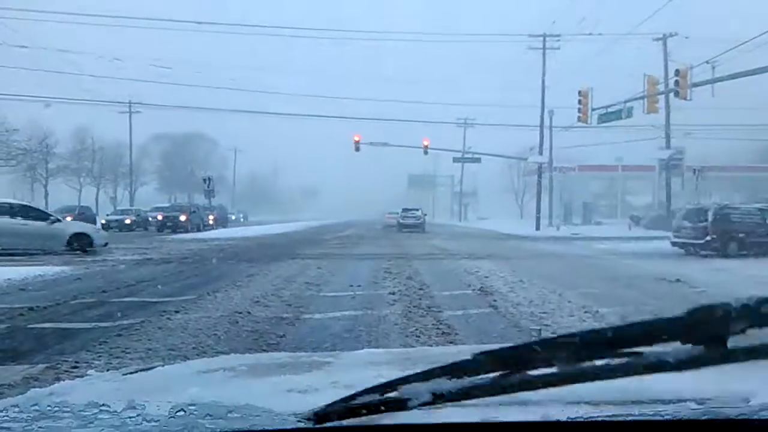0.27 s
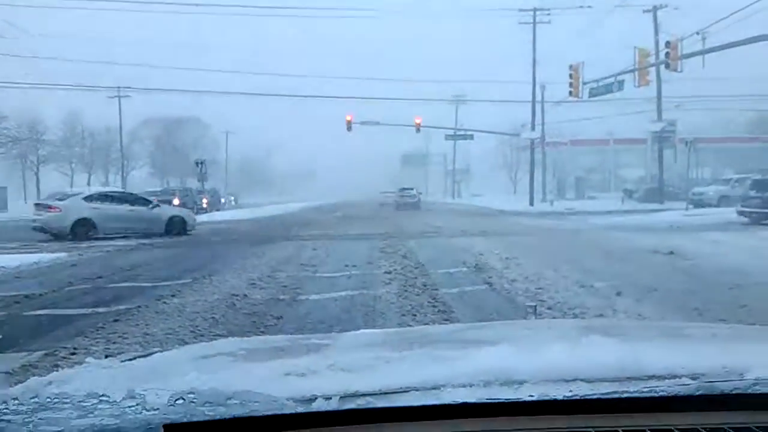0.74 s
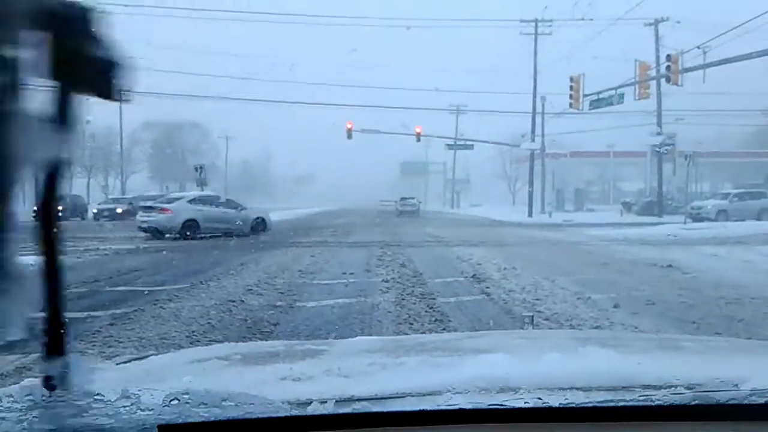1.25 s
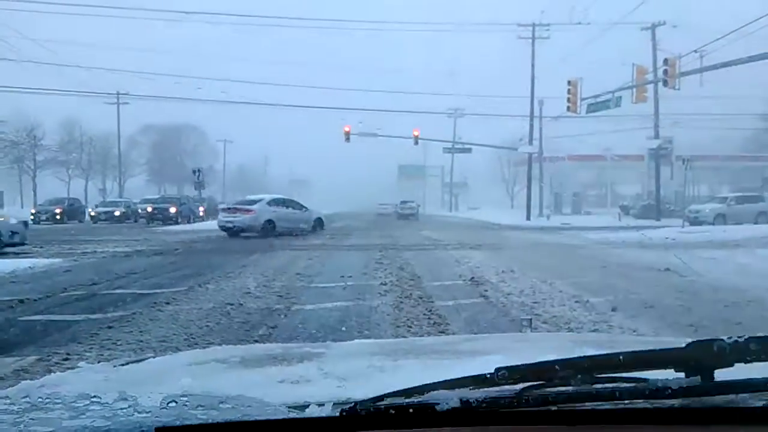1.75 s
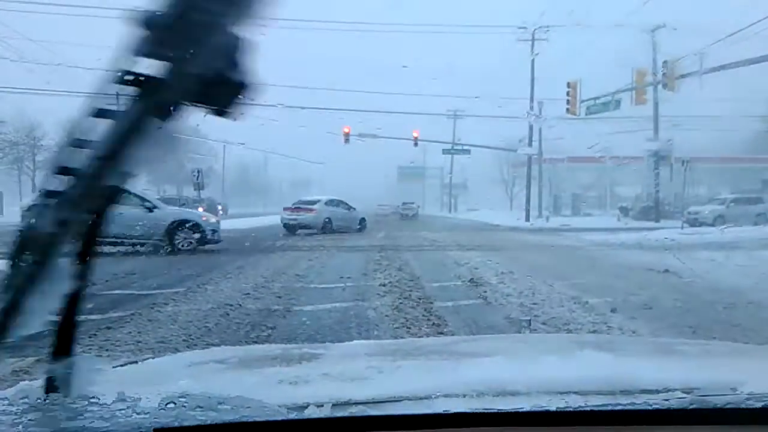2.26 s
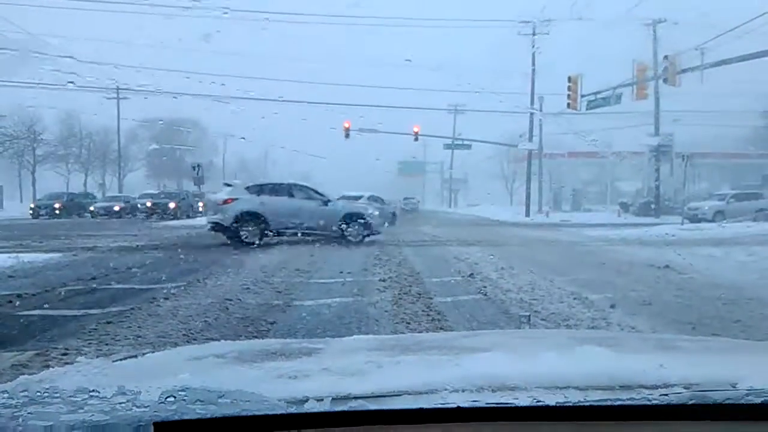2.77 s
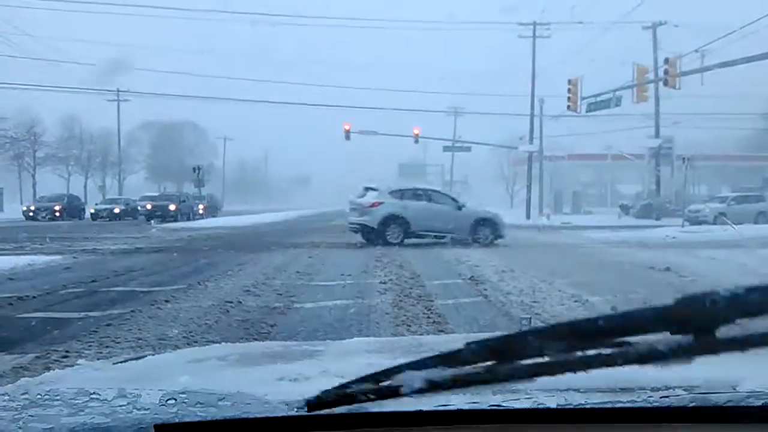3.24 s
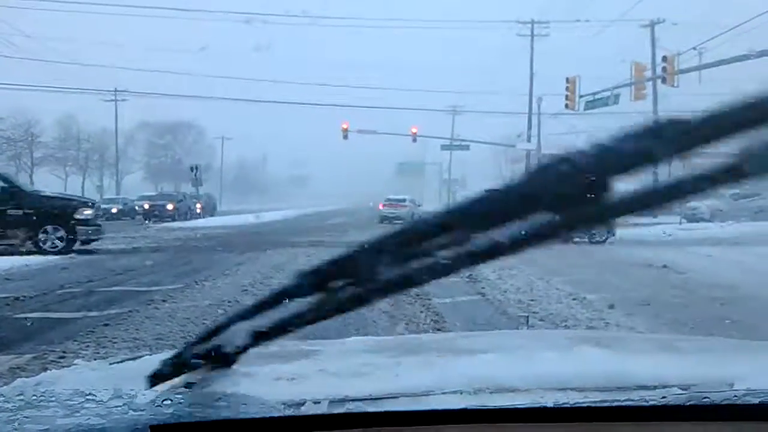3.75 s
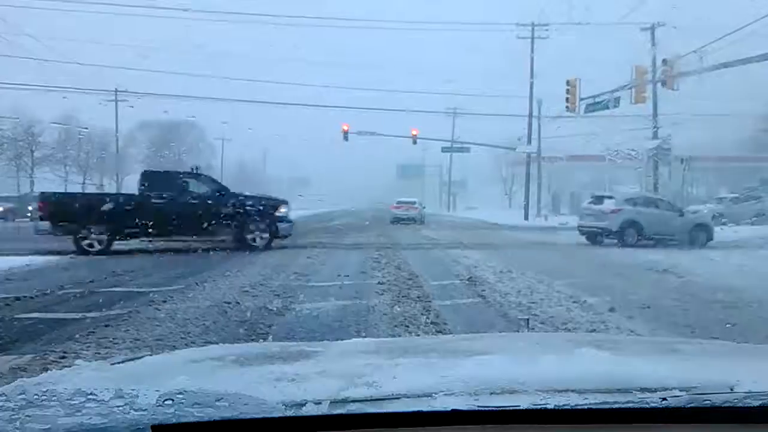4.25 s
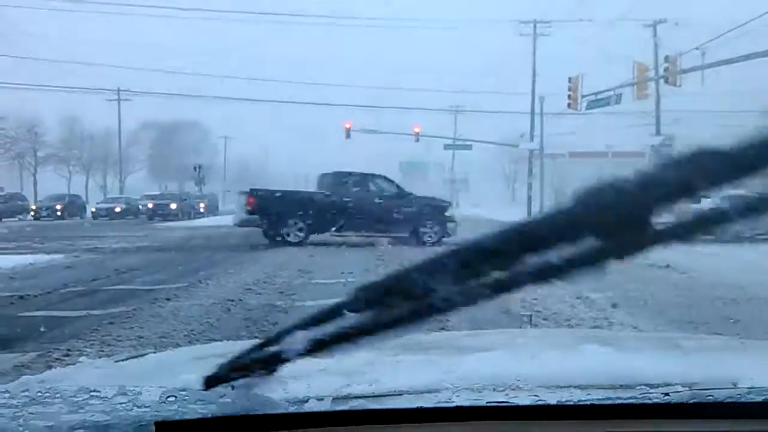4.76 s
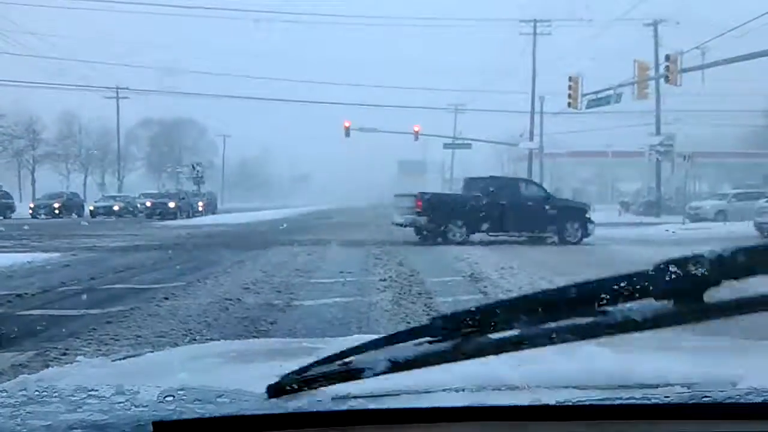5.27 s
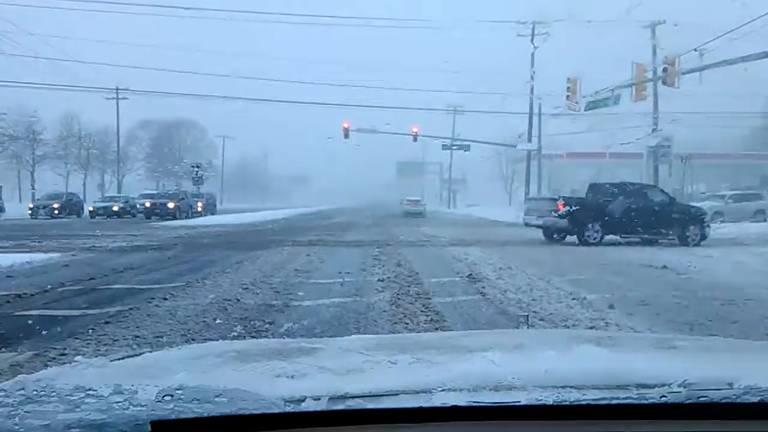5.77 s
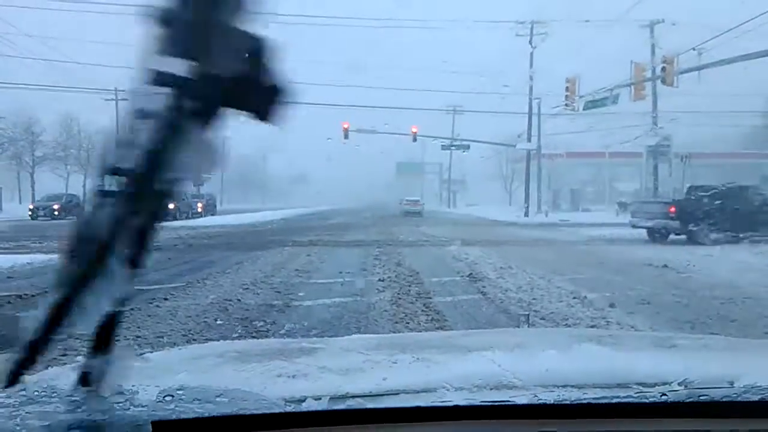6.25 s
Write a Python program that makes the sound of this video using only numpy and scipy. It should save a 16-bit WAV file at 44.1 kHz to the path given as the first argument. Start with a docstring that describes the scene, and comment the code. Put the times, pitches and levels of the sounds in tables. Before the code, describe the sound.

Windshield wipers judder loudly up wet glass three times, with soft hissing glides and flip-over knocks between, over a low idling engine inside a car.

```python
"""Wiper blades sweep a windshield every 1.65 s, heard by two microphones inside a car idling in falling snow.
On three upstrokes the rubber judders: stick-slip impulses, mostly slowing, drum the glass and ring the frame.
Between these the blades glide with a soft hiss of shaped noise and flip over at each end with short noise bursts.
The linkage thumps in decaying low sines, and brief gliding tones squeak.
Beneath lie the engine rumble and the heater air, both steady noise in low bands."""
import sys
import numpy as np
from scipy import signal
from scipy.fft import rfft, irfft, next_fast_len
from scipy.io import wavfile
from scipy.ndimage import uniform_filter1d, minimum_filter1d, map_coordinates

SR = 44100
rng = np.random.default_rng(int(sys.argv[2]) if len(sys.argv) > 2 else 0)


def persist_wave(psi):
    """Save psi, clipped to +-1, as 16-bit WAV."""
    counts = np.round(np.clip(psi, -1, 1) * 32767).astype(np.int16)
    wavfile.write(sys.argv[1], SR, np.atleast_2d(counts).T)


N = 287091  # length in samples

# Juddering upstrokes. Each row: start in seconds, length in seconds, level in dB, extra rattle and rasp in dB.
JUDDER_STROKES = [(2.095, .53, -1, 0), (3.737, 0.53, 0.1, 0.6), (5.38, 0.499, .5, -1.5)]
# The blades turn at the bottom of the glass. Each row: time in seconds, level in dB.
BOTTOM_FLIPS = [(.192, 0), (1.838, -0.5), (3.483, -0.5), (5.141, -.5)]
# The blades turn at the top of the glass. Each row: time in seconds, then snap, knock and tick levels in dB.
TOP_FLIPS = [(.995, -38, -29.5, -42.5), (2.659, -32.5, -29.5, -41), (4.308, -35.5, -33.5, -52),
             (5.953, -36, -31.5, -43)]
# Where along a juddering stroke (share of it) the blades fall out of step, and where they settle again.
STUMBLE_AT, SETTLE_AT = 0.23, 0.63


def amp(db):
    """Decibels to gain."""
    return 10 ** (np.asarray(db) / 20)


def unit(x):
    """Scale to rms 1."""
    return x / np.sqrt(np.mean(x ** 2) + 1e-20)


def steady(x, span=0.026):
    """Hold the running rms, over about span seconds, near 1, so that a level curve can set it."""
    power = np.mean(np.atleast_2d(x) ** 2, axis=0)
    smooth = uniform_filter1d(power, int(span * SR))
    smooth = uniform_filter1d(smooth, int(span * SR / 2))
    return x / np.sqrt(np.abs(smooth) + 1e-12)


def along(points, hz):
    """Read a curve of (Hz, value) points on a log frequency axis."""
    f, value = np.transpose(points)
    return np.interp(np.log(hz + 1), np.log(f + 1), value)


def curves(rows):
    """One value per sample for each column after the time."""
    s, *columns = np.transpose(rows)
    return [np.interp(np.arange(N) / SR, s, column) for column in columns]


def wobble(rate):
    """A smooth random curve with rate knots a second."""
    knots = rng.standard_normal(int(N * rate / SR) + 4)
    return map_coordinates(knots, [np.arange(N) * rate / SR])


def filtered(x, response):
    """Multiply the spectrum of x by a response of frequency."""
    n = x.shape[-1]
    m = next_fast_len(n + 8192)
    return irfft(rfft(x, m) * response(np.fft.rfftfreq(m, 1 / SR)), m)[..., :n]


def noise(spectrum, envelope=1., size=N):
    """Stereo noise of rms 1, shaped in time and then in colour: alike in the bass, diffuse in the treble."""
    # Likeness of the two microphones. Each row: frequency in Hz, left-right correlation from -1 to 1.
    likeness = [(60, 1), (130, 0.99), (290, 0.72), (630, 0.75), (1370, -0.42), (3000, 0.21), (6500, -0.17)]

    def mid_and_side(hz):
        turn = np.arccos(np.clip(along(likeness, hz), -1, 1)) / 2
        return amp(along(spectrum, hz)) * np.array([np.cos(turn), np.sin(turn)])

    white = envelope * rng.standard_normal((2, size))
    mid, side = filtered(white, mid_and_side)
    return unit(np.array([mid + side, mid - side]))


def cabin(x, t60, wet_db):
    """Dense, short reflections off glass and dashboard, different at each microphone."""
    t = np.arange(SR // 6) / SR
    tail = rng.standard_normal((2, len(t))) * amp(-60 * t / t60)
    tail /= np.linalg.norm(tail, axis=1, keepdims=True)
    return x + amp(wet_db) * signal.fftconvolve(x, tail, axes=1)[:, :N]


def restless(x, depth_db):
    """The colour shifts in patches as the blade travels over new parts of the glass."""
    z = signal.stft(x, nperseg=1024)[2]
    patches = uniform_filter1d(rng.standard_normal(z.shape[1:]), size=7, axis=0)
    patches = uniform_filter1d(patches, size=5, axis=1)
    return signal.istft(z * amp(depth_db * unit(patches)), nperseg=1024)[1][:, :N]


def add(track, s, sound):
    """Mix a sound in at time s."""
    part = track[:, max(round(s * SR), 0):][:, :sound.shape[-1]]
    part += sound[..., :part.shape[1]]


def idle():
    """The engine booms in the low modes of the cabin, under the steady air of the heater fan."""
    # Common level of rumble and air. Each row: time in seconds, level in dB.
    background = [(0, 2), (.3, 0.5), (1.08, 1), (1.17, -5), (1.35, -1.5), (1.7, 1.5), (2.9, -2),
                  (3.6, -0.5), (4.7, -2), (5.25, 1), (6.1, -1.5), (6.51, -5)]
    # Colour of the engine boom. Each row: frequency in Hz, relative level in dB per Hz.
    boom_colour = [(15, -14.5), (27, -18.5), (38, -28), (47, -17.5), (62, -1), (75, 2), (92, -2),
                   (118, 3.5), (150, -1.5), (185, -5), (230, -17.5), (400, -53), (900, -84.5)]
    # Colour of the heater air. Each row: frequency in Hz, relative level in dB per Hz.
    air_colour = [(140, -26), (230, -4), (253, -1.5), (291, -3.5), (360, 1), (470, -10), (508, -7),
                  (590, -14), (643, -6.5), (770, -16), (839, -7), (1090, -21), (1500, -28), (1950, -66.5),
                  (3300, -120)]
    level_db, = curves(background)
    rumble = amp(-31 + 1.5 * wobble(14)) * steady(noise(boom_colour), span=0.32)
    air = amp(-40.5 + 1.1 * wobble(10.0)) * noise(air_colour)
    return amp(level_db) * (rumble + air)


def around(turns, rise_db_per_s, fall_db_per_s):
    """Gain that grows towards each turn of the blades and fades after it."""
    t = np.arange(N) / SR
    return sum(amp(-np.maximum(rise_db_per_s * (s - t), fall_db_per_s * (t - s))) for s, *_ in turns)


def gate(start, length, edge_s):
    """Gain that opens at start and closes after length seconds."""
    age = np.arange(N) / SR - start
    return np.clip(np.minimum(age, length - age) / edge_s + .5, 0, 1)


def glide():
    """Rubber hisses grainily over wet glass, most in the slush at both ends of the sweep, and sings going down."""
    # Colour of the wet hiss. Each row: frequency in Hz, relative level in dB per Hz.
    hiss_colour = [(700, -35), (1150, -15.5), (1600, 1.5), (2100, 0), (2600, 1.5), (3000, -1), (3600, -5),
                   (5100, -7.5), (6500, -12.5), (7300, -20.5), (8200, -37.5), (14500, -49.5)]
    # Colour of the thin singing. Each row: frequency in Hz, relative level in dB per Hz.
    sing_colour = [(1900, -37), (2350, -11), (2600, 3), (2950, -1), (3300, -11), (4200, -35), (8000, -70.5)]
    # Colour of the narrow whistle. Each row: frequency in Hz, relative level in dB per Hz.
    whistle_colour = [(4000, -52.5), (4750, -9.5), (5000, -10.5), (5300, -10), (6200, -51.5)]

    mid_glass = amp(-61.5)
    bottom = amp(-52) * around(BOTTOM_FLIPS, rise_db_per_s=23, fall_db_per_s=36)
    top = amp(-48) * around(TOP_FLIPS, rise_db_per_s=597, fall_db_per_s=74)
    wet = np.sqrt(mid_glass ** 2 + bottom ** 2 + top ** 2)
    grain = amp(1.5 * wobble(300))
    hiss = wet * amp(1.1 * wobble(25)) * restless(noise(hiss_colour, grain), depth_db=1.3)

    # the rubber sings on the last part of each downstroke
    sing_s = 0.25
    descent = sum(gate(s - sing_s, sing_s, edge_s=.02) for s, _ in BOTTOM_FLIPS)
    sing = amp(-57 + 1.6 * wobble(35)) * descent * noise(sing_colour, amp(3.0 * wobble(160)))

    # one downstroke whistles thinly
    whistle = amp(-64) * gate(2.83, length=0.36, edge_s=0.1) * noise(whistle_colour)
    return hiss + sing + whistle


def flip(snap_db, knock_db, tick_db, t60):
    """The lip turns over with a wet snap and a tick while the arm knocks on its joint."""
    # Colour of the snapping lip. Each row: frequency in Hz, relative level in dB per Hz.
    snap_colour = [(600, -39), (1150, -4), (1500, 0.5), (1900, 0.5), (2400, 0.5), (2900, 0), (3400, -10.5),
                   (4000, -14), (7000, -42), (9000, -61.5)]
    # Colour of the tick. Each row: frequency in Hz, relative level in dB per Hz.
    tick_colour = [(2000, -22), (3500, -11), (4300, 3), (4900, -5), (5600, -7.5), (6600, -11), (7400, -24),
                   (8500, -33), (14000, -55.5)]
    # Colour of the knocking arm. Each row: frequency in Hz, relative level in dB per Hz.
    knock_colour = [(150, -11), (350, 4.5), (520, 1), (650, -1.5), (800, 1), (1000, -3.5), (1250, -13),
                    (2500, -63), (7000, -87.5)]
    t = np.arange(SR // 4) / SR
    snap = amp(snap_db - 60 * t / max(t60, .01)) * noise(snap_colour, size=len(t))
    tick = amp(tick_db - 60 * t / .1) * noise(tick_colour, size=len(t))
    knock = amp(knock_db - 60 * t / 0.22) * noise(knock_colour, size=len(t))
    onset = 1 - np.exp(-t / .001)
    return (snap + tick + knock) * onset


def flips():
    """Three contacts at each bottom turn, one at each top turn, and a few scuffs on the way."""
    # Tick, flip and rebound of a bottom turn. Each row: delay in seconds, then snap, knock and tick
    # levels in dB before the level of the turn, and the snap's decay by 60 dB in seconds.
    contacts = [(-.017, -44, -43, -44, .09), (0, -35.5, -26.5, -53, .1), (.074, -40, -32, -58, .13)]
    # A blade catches on the way up. Each row: time in seconds, snap level in dB, knock level in dB.
    scuffs = [(.382, -52, -39.5), (.578, -41, -28.5), (.601, -39.5, -30), (2.64, -39, -36),
              (3.726, -46.5, -24)]
    out = np.zeros((2, N))
    for s, db in BOTTOM_FLIPS:
        for delay, *contact in contacts:
            add(out, s + delay, amp(db) * flip(*contact))
    for s, *levels_db in TOP_FLIPS:
        add(out, s, flip(*levels_db, t60=0.1))
    for s, snap_db, knock_db in scuffs:
        add(out, s, flip(snap_db, knock_db, tick_db=-67, t60=0.15))
    return restless(out, depth_db=3.5)


def thumps():
    """The linkage takes up its play and bumps the bulkhead, which answers with a pair of low, damped modes."""
    # Each row: time in seconds, level in dB ahead of a common 1 dB cut, pitch of the lower mode in Hz.
    bumps = [(0.418, -17.5, 153), (1.006, -14.5, 182), (2.059, -23, 118), (2.664, -13.5, 118),
             (3.591, -18, 121), (4.325, -14, 169.8), (4.351, -10.5, 119.3), (5.364, -10.5, 123),
             (6.255, -13.5, 106.6), (6.377, -14.5, 112.6)]
    out, t = np.zeros((2, N)), np.arange(SR // 3) / SR
    onset = 1 - np.exp(-t / 0.0046)
    for s, db, hz in bumps:
        modes = np.sin(2 * np.pi * hz * t) + 0.51 * np.sin(2 * np.pi * hz * 1.45 * t)
        decay = amp(db - 1 - 60 * t / 0.14)
        add(out, s - .003, decay * onset * modes)  # starts 3 ms ahead of the listed time
    return out


def squeaks():
    """The rubber edge squeaks briefly and hoarsely on a dry patch, its pitch trembling as it glides."""
    # Each row: start in seconds, length in seconds, level in dB, first and last pitch in Hz before the tremble.
    dry_patches = [(0.469, 0.033, -40, 1337, 1500), (0.478, 0.02, -50, 1966, 2270),
                   (1.072, 0.017, -47.5, 2150, 4070), (1.587, 0.014, -40.5, 2420, 2660),
                   (1.623, 0.035, -46, 2550, 2520), (2.702, 0.016, -41, 2410, 2780),
                   (3.236, 0.017, -46, 2564, 2600), (4.887, 0.023, -50.5, 2515, 2740)]
    out, tremble = np.zeros((2, N)), wobble(1500)
    flutter = amp(1.5 * wobble(250))
    for s, length, db, first_hz, last_hz in dry_patches:
        u = np.linspace(0, 1, max(int(length * SR), 16))
        hz = np.geomspace(first_hz, last_hz, len(u))
        hz = hz * (1 + .2 * tremble[round(s * SR):][:len(u)])
        arch = np.sqrt(4 * u * (1 - u))
        add(out, s, amp(db) * arch * np.sin(2 * np.pi * np.cumsum(hz) / SR))
    return cabin(out * flutter, t60=0.11, wet_db=0.0)


def progress():
    """For each juddering stroke, the share of it that has passed."""
    return np.array([(np.arange(N) / SR - start) / length for start, length, *_ in JUDDER_STROKES])


def roughness():
    """The blades slip evenly at both ends of a stroke and clash in the span between stumble and settling."""
    u = progress()
    clash = np.clip(np.minimum(u - STUMBLE_AT, SETTLE_AT - u) / .1 + .5, 0, 1).sum(axis=0)
    return np.clip(0.1299 + 0.483 * clash, 0, 1)


def falter():
    """Gain of the drumming, which dips by 3.5 dB as the blades fall out of step."""
    width = 0.08  # share of the stroke
    dip = np.exp(-((progress() - STUMBLE_AT) / width) ** 2).sum(axis=0)
    return amp(-3.5 * dip)


def swell(attack_s, hold, fall_db_per_s, grow_db=0, rattle=0):
    """Gain of one part of the judder: it starts, changes by grow_db over a share of each stroke, then dies away."""
    t, gain = np.arange(N) / SR, np.zeros(N)
    for start, length, db, rattle_db in JUDDER_STROKES:
        age = t - start
        hold_s = hold * length
        contact = np.clip(age / attack_s, 0, 1) * np.clip((length - age) / 0.032 + 1, 0, 1)
        growth_db = grow_db * np.clip(age / hold_s, 0, 1)
        fall_db = fall_db_per_s * np.maximum(age - hold_s, 0)
        gain += contact * amp(db + rattle * rattle_db + growth_db - fall_db)
    return gain


def slips(phase, scatter, size_db):
    """One impulse per stick-slip cycle, uneven in time (scatter in s) and in size."""
    at = np.flatnonzero(np.diff(np.floor(phase)) > 0)
    chance = rng.standard_normal((len(at), 2))
    when = np.clip(at + chance[:, 0] * scatter[at] * SR, 0, N - 1).astype(int)
    return np.bincount(when, amp(size_db * chance[:, 1]), N)


def from_right(x, lag):
    """A source on the right reaches the left microphone lag seconds later."""
    return filtered(x, lambda hz: np.exp(-2j * np.pi * hz * np.array([[lag], [0]])))


def ring(x, spectrum, size=8192):
    """Play x through a causal, minimum-phase body with this spectrum."""
    cepstrum = irfft(np.log(amp(along(spectrum, np.fft.rfftfreq(size, 1 / SR)))))
    cepstrum[1:size // 2] *= 2
    cepstrum[size // 2 + 1:] = 0
    response = irfft(np.exp(rfft(cepstrum)))
    return signal.fftconvolve(np.atleast_2d(x), response[None], axes=1)[:, :N]


def flare(snaps, t60, echo_db, rise_s=0.0014):
    """Envelope of the noise that each slip sets off: a quick burst and its fading echo in the cabin."""
    age = np.arange(SR // 8) / SR
    power = amp(-60 * age / t60) ** 2 + amp(echo_db - 60 * age / .1) ** 2
    power = power * (1 - np.exp(-age / rise_s)) ** 2
    return np.sqrt(np.abs(signal.fftconvolve(snaps ** 2, power)[:N]))


def judder():
    """Every slip drums the glass, rings the blade frame and tears off a short rasp."""
    # Stick-slip of the leading blade, one list per stroke. Each row: time in seconds, mean slip rate in Hz.
    slip_curves = [
        [(2.1, 176.9), (2.146, 136.9), (2.17, 136.5), (2.206, 144.5), (2.26, 152.4), (2.304, 127.8),
         (2.316, 127.2), (2.364, 130.1), (2.422, 125.6), (2.444, 112.5), (2.536, 103.8), (2.62, 105.3)],
        [(3.75, 188.9), (3.78, 145.5), (3.826, 142.5), (3.87, 134.3), (3.908, 123.7), (3.942, 131.3),
         (4.01, 122.9), (4.052, 122.9), (4.084, 103.7), (4.138, 95.46), (4.162, 98), (4.26, 123.8)],
        [(5.39, 188), (5.444, 152.1), (5.478, 141.5), (5.524, 142.7), (5.554, 148.5), (5.566, 145.2),
         (5.6, 126), (5.64, 126.3), (5.694, 130), (5.738, 111.2), (5.808, 100.8), (5.88, 118.9)],
    ]
    # Response of the windshield. Each row: frequency in Hz, relative level in dB.
    glass = [(60, -61.5), (140, -24), (195, 0.5), (250, 2), (330, 1), (400, -2.5), (470, -10), (600, -18),
             (800, -26.5), (1500, -71), (3000, -118), (6000, -120)]
    # Response of the blade frame. Each row: frequency in Hz, relative level in dB.
    blade_frame = [(250, -40.5), (450, -14), (560, -2), (630, 1.5), (710, -2.5), (800, 4.5), (900, -5.5),
                   (1100, -9.5), (1400, -14), (2200, -36), (5000, -74), (9000, -100)]
    # Colour of the torn-off rasp. Each row: frequency in Hz, relative level in dB per Hz.
    rasp_colour = [(500, -30.5), (1000, 5), (1550, 0), (2050, -1), (2600, -6.5), (3200, -9.5), (4000, -14),
                   (5300, -16), (6500, -21.5), (7200, -29), (8000, -36), (10500, -44), (14500, -50.5)]

    rate, = curves(np.vstack(slip_curves))
    rough = roughness()
    phase = np.cumsum(rate * (1 + .07 * rough * wobble(60) + .015 * wobble(90))) / SR
    # the second blade slips at its own pace; the two clash where the stroke is rough
    other_phase = np.cumsum(rate * (.84 + .07 * wobble(18))) / SR
    lead = slips(phase, .0004 * rough, size_db=2.5)
    other = slips(other_phase, 0.00065 * rough, size_db=2.0)

    # the arms sway at the slip rate and push the whole pane
    sway = np.sin(2 * np.pi * phase) * amp(8.7 * rough * wobble(60))
    sway = sway + 0.26 * rough * np.sin(2 * np.pi * other_phase)
    sway = steady(from_right(sway, lag=0.00027))

    blows = lead + 1.05 * rough * other
    drum = steady(from_right(ring(blows, glass), lag=0.00033))
    drum_noise = steady(noise(glass, flare(blows, t60=0.015, echo_db=-13)))
    drum = steady(drum + (0.31 + .5 * rough) * drum_noise)

    # the frame rings and rattles, harder on some slips than on others
    snaps = (lead + 1.2 * rough * other) * amp(1.2 * wobble(130))
    tone = steady(from_right(ring(snaps, blade_frame), lag=0.00034))
    rattle = steady(noise(blade_frame, flare(snaps, t60=0.015, echo_db=-15)))
    frame = steady(restless(tone + 0.94 * rattle, depth_db=5.5))

    rasp = steady(noise(rasp_colour, flare(snaps, t60=.012, echo_db=-25)))
    rasp = steady(restless(cabin(rasp, t60=0.12, wet_db=-4), depth_db=2.5))

    # the sway begins to die first, the drumming last
    sway = sway * amp(-10.5 + 1.4 * wobble(20)) * swell(attack_s=.025, hold=.34, fall_db_per_s=85)
    drum = drum * falter() * amp(-9.0 + 1.2 * wobble(24))
    drum = drum * swell(attack_s=0.047, hold=0.8, fall_db_per_s=137.5, grow_db=1.0)
    frame = frame * amp(-17.5 + 1.0 * wobble(25))
    frame = frame * swell(attack_s=.045, hold=.63, fall_db_per_s=91.5, grow_db=0.8, rattle=1)
    rasp = rasp * amp(-26 + 1.2 * wobble(30))
    rasp = rasp * swell(attack_s=0.033, hold=0.79, fall_db_per_s=67.5, grow_db=-0.5, rattle=0.86)
    return sway + drum + frame + rasp


def scene():
    """Wipers and engine together, mostly stronger at the right microphone, above all in the top treble."""
    # Balance of the microphones. Each row: frequency in Hz, left minus right in dB.
    balance = [(60, -0.5), (200, -2.3), (500, -0.4), (1500, -1.9), (4200, 1), (7800, -5), (14000, -8)]
    dry = idle() + glide() + flips() + thumps() + squeaks() + judder()
    return filtered(dry, lambda hz: amp(along(balance, hz) * np.array([[.5], [-.5]])))


def record(dry):
    """A fast, soft-kneed limiter holds the peaks down; nothing is kept above 14750 Hz."""
    need = (1 + (np.abs(dry) / .87) ** 8) ** (-1 / 8)
    gain = uniform_filter1d(minimum_filter1d(need, size=129, axis=1), size=129, axis=1)
    return filtered(dry * gain, lambda hz: hz < 14750)


dry = scene()
out = record(dry)
persist_wave(out)
```